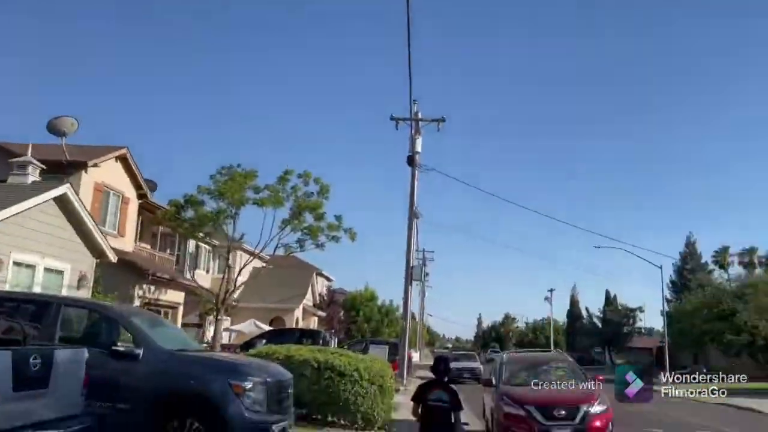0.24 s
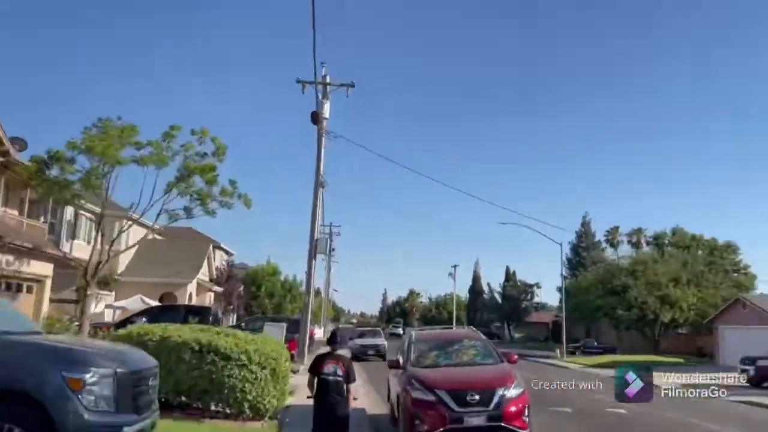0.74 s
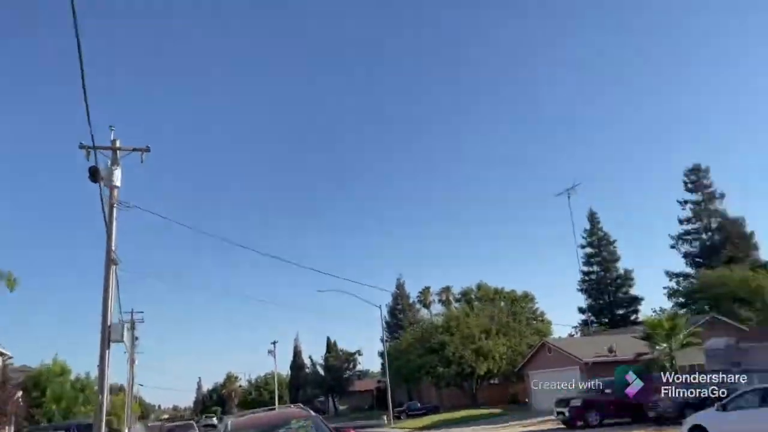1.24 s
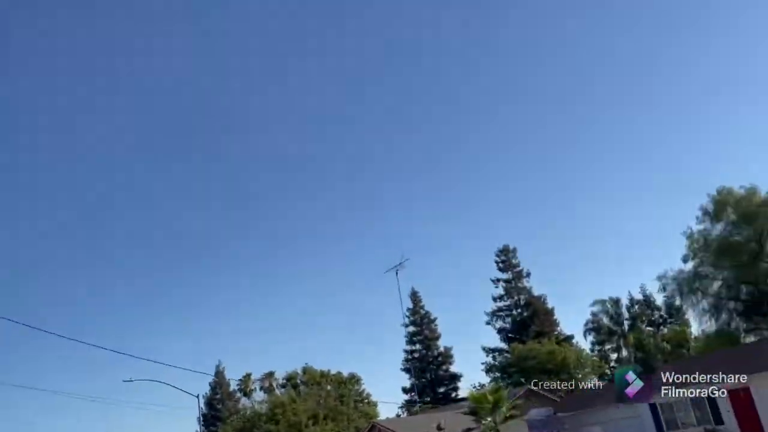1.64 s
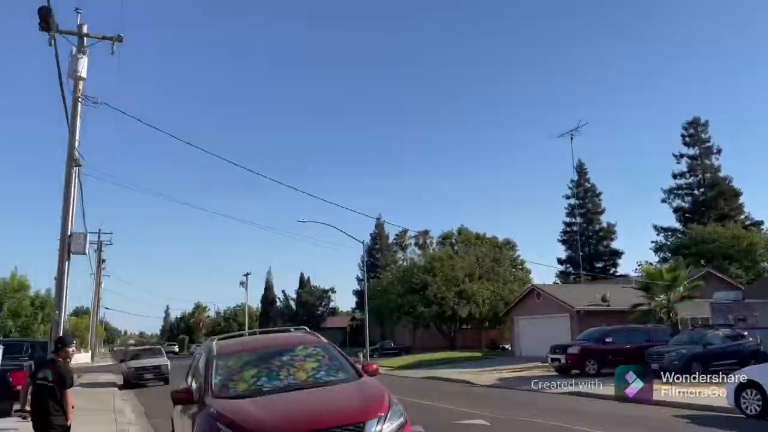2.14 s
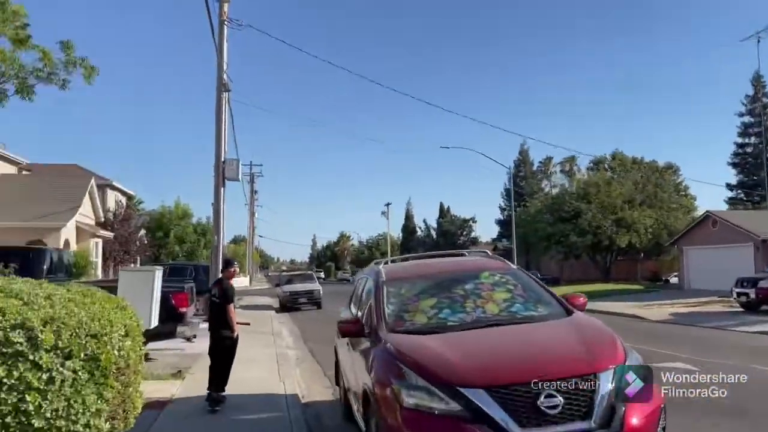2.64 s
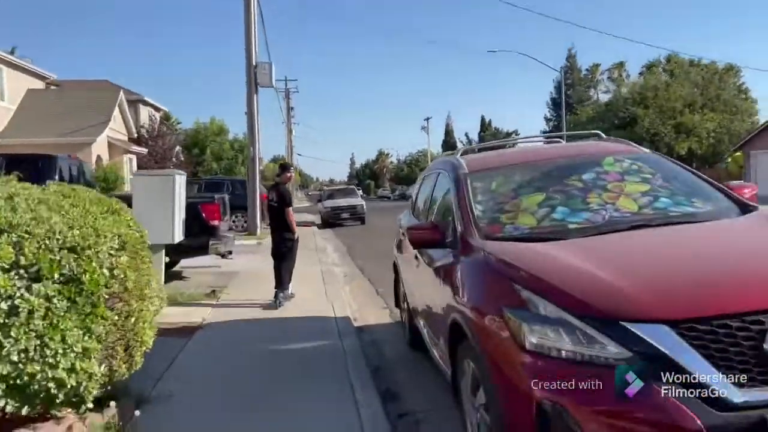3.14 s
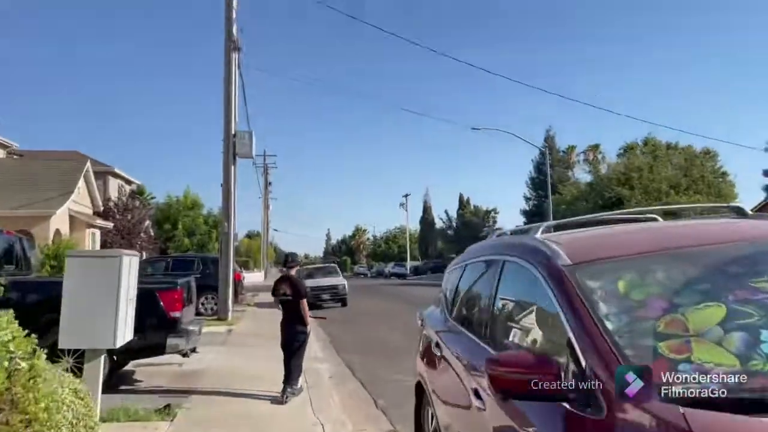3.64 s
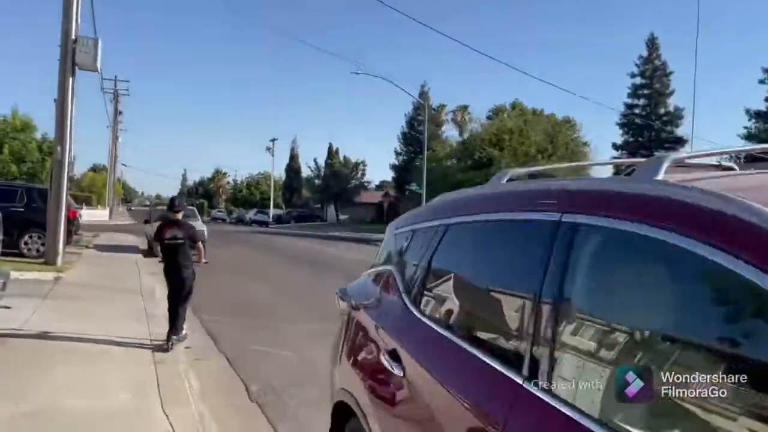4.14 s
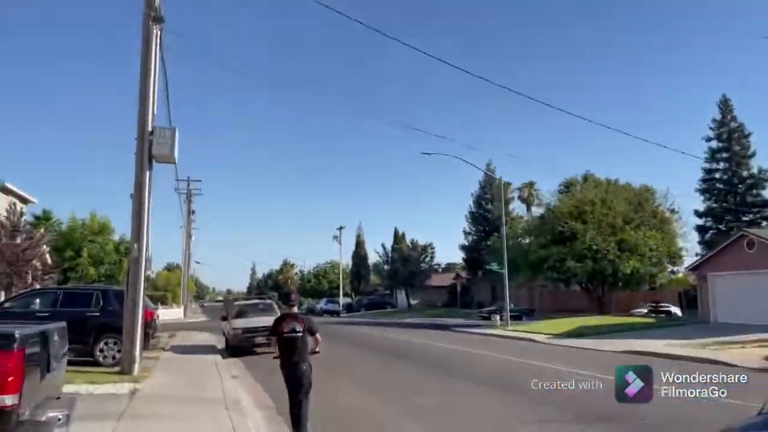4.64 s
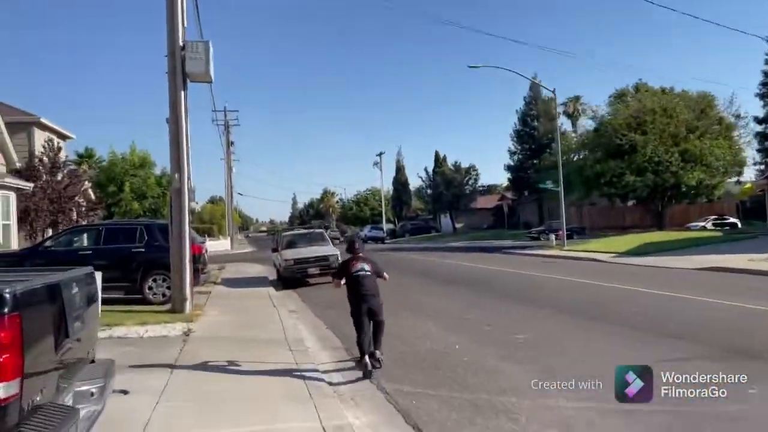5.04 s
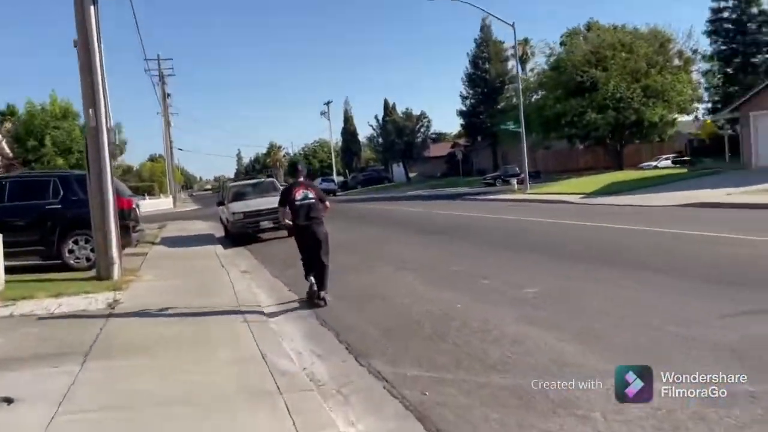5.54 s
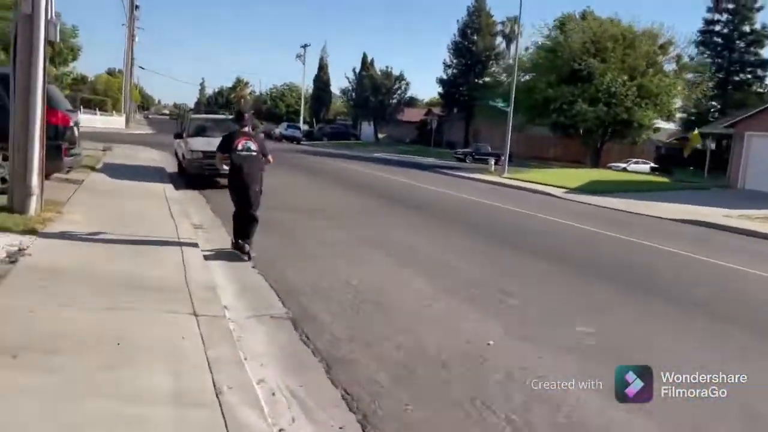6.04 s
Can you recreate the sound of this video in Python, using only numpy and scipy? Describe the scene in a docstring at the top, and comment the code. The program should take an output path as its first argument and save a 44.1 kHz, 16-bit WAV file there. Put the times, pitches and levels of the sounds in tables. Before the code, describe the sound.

Small hard scooter wheels roll over a concrete sidewalk, clacking at the joints and briefly skidding, while wind buffets the microphone.

```python
"""A concrete sidewalk, heard from a rolling scooter with small hard wheels.
Grit roars through the stem, bumps make the deck rumble and thump, and the wheels clack into slab joints.
Now and then gravel cracks, sand hisses or a wheel slips and scrapes; once it skids, the tyre squawking
and the fork rattling. A small metal piece ticks and the bearings whir faintly. The street throws back
thin echoes of the blows, and air buffets the two microphone ports."""
import sys
import numpy as np
from scipy import signal
from scipy.fft import rfft, irfft
from scipy.io import wavfile
from scipy.ndimage import uniform_filter1d

SR = 44100
rng = np.random.default_rng(int(sys.argv[2]) if len(sys.argv) > 2 else 0)


def store_pcm(level_fs):
    """Save levels as 16-bit WAV."""
    pcm = np.round(np.clip(level_fs, -1, 1) * 32767).astype(np.int16)
    wavfile.write(sys.argv[1], SR, np.atleast_2d(pcm).T)


N = 277389
TIME = np.arange(N) / SR
HZ = np.fft.rfftfreq(N, 1 / SR)

# how hard the wheels roll, from speed and coarseness of the concrete: time_s, level_db
ROLL_EFFORT = [(0, -39), (0.35, -40), (0.8, -42), (1.35, -41.5), (1.65, -41.5), (2.2, -41), (2.48, -38),
               (2.73, -39.5), (3.3, -37), (3.45, -39), (3.63, -35.5), (3.82, -42), (3.95, -38),
               (4.4, -35.5), (4.65, -37.5), (4.9, -38), (5.4, -35.5), (5.7, -39), (6.05, -34.5),
               (6.29, -38)]
# narrow resonances of wheels and stem: centre_hz, width_hz, gain_db
STEM_RESONANCES = [(420, 50, 3), (520, 40, 2), (580, 60, -3), (670, 55, 6), (1170, 140, 3), (1410, 50, 2),
                   (1560, 70, -2), (1760, 90, 4), (1930, 130, -7), (2250, 110, 3), (2470, 70, 2),
                   (2660, 130, 3), (3050, 300, -2), (3850, 240, 3), (4480, 120, 3), (5250, 200, 2),
                   (5980, 150, 3), (6320, 150, 3)]
# gusts on the microphone: peak_s, level_db, length_s
GUSTS = [(0.069, -22.5, 0.049), (0.743, -28, 0.051), (1.121, -33.5, 0.05), (1.19, -35.5, 0.04),
         (1.26, -25.5, 0.07), (1.655, -22.5, 0.066), (1.73, -19.5, 0.026), (1.774, -19, 0.015),
         (1.819, -22.5, 0.033), (1.878, -30.5, 0.021), (2.172, -26, 0.05), (2.221, -18.5, 0.02),
         (2.312, -16.5, 0.059), (2.428, -21, 0.062), (2.485, -18.5, 0.024), (2.525, -22.5, 0.022),
         (2.706, -19.5, 0.064), (2.743, -19.5, 0.028), (2.932, -43, 0.22), (3.662, -28.5, 0.098),
         (4.073, -30, 0.26), (4.249, -24, 0.018), (4.546, -28, 0.13), (4.733, -26.5, 0.072),
         (4.87, -32.5, 0.025), (5.03, -33, 0.04), (5.857, -27.5, 0.12), (6.004, -28, 0.065),
         (6.084, -27, 0.062)]


def rolling(gain_db=0.5, grain_db=2, grains_per_s=2500, flicker_db=1.3, drift_db=0.8, cruise_db=-40):
    """Grit roars under the wheels; harder rolling is louder and brighter, and coarse slabs grind more."""
    # tone of the roar: frequency_hz, level_db
    roar_spectrum = [(150, -10), (330, -7.5), (480, -0.5), (670, 0.5), (850, -1.5), (1250, -8.5),
                     (1650, -10.5), (2300, -19), (3000, -24.5), (5000, -28.5), (7500, -39.5), (10000, -42),
                     (13000, -47.5), (15500, -54)]
    # upper mids, low on smooth slabs and high on coarse ones: time_s, gain_db
    coarseness = [(0, -4.5), (0.45, -1), (1.35, -0.5), (1.65, 3.5), (2.7, -2), (3.5, 0), (4.1, 0.5),
                  (4.6, 2), (5.3, 2), (5.85, 2), (6.29, 4)]
    grind_hz, grind_width_hz, hiss_above_hz = 1850, 1100, 2000
    sizes = gain_of(grain_db * np.minimum(rng.exponential(1, (2, N)), 5))
    grains = sizes * rng.standard_normal((2, N)) * sparse((2, N), grains_per_s)
    force = evened(grains) + rng.standard_normal((2, N))
    roar = evened(wheel_tilt(through_stem(force, roar_spectrum)))
    effort_db = follow(ROLL_EFFORT)
    roar *= gain_of(effort_db + gain_db + flicker_db * wander(34) + drift_db * wander(11))
    grind = irfft(rfft(roar) / (1 + (2 * (HZ - grind_hz) / grind_width_hz) ** 4), N)
    roar += grind * (gain_of(follow(coarseness)) - 1)
    hiss = irfft(rfft(roar) / (1 + (hiss_above_hz / (HZ + 1)) ** 6), N)
    return roar + hiss * (gain_of(effort_db - cruise_db) - 1)


def slab_joints(drop_s=0.003, graze_s=0.0041, first_touch=0.05, detune=0.055):
    """A wheel grazes a joint, then slams its far edge: a snap, a clack, a sinking thud in the frame."""
    # wheels hitting joints: start_s, thud_db, clack_db, snap_db
    hits = [(0.1233, -8.5, -23.5, -27.5), (0.705, -29, -30.5, -58), (0.9088, -9, -19.5, -32),
            (1.243, -26.5, -38.5, -62), (1.4448, -10, -17.5, -34.5), (1.464, -25, -45, -44),
            (1.503, -38, -48, -48.5), (1.743, -26, -46, -65.5), (2.143, -26.5, -31.5, -58),
            (2.332, -16.5, -20.5, -38.5), (3.106, -31, -27.5, -44), (3.129, -10.5, -18.5, -31),
            (3.277, -25, -41, -41), (3.875, -8, -14, -25), (3.897, -22, -29, -36), (3.937, -30, -47, -45),
            (4.212, -11.5, -35, -47), (4.267, -42, -16, -27.5), (4.463, -27, -24.5, -46),
            (4.547, -15, -28, -43), (4.599, -15, -22.5, -29), (4.629, -17.5, -30.5, -50),
            (4.706, -16.5, -49, -63.5), (4.999, -16, -36, -44), (5.147, -12.5, -22.5, -34),
            (5.571, -4, -13, -25.5), (5.966, -19, -32.5, -54), (6.057, -10, -38, -47),
            (6.086, -14, -32.5, -43), (6.237, -8, -20, -29), (6.266, -15.5, -28, -49)]
    # modes of deck and frame: pitch_hz, level_db, t60_s
    frame_modes = [(149.5, -7.5, 0.06), (237, 3, 0.038), (301, -6.5, 0.027), (424.4, -5.5, 0.056),
                   (651, -13, 0.069), (926, -20, 0.13), (1310, -37, 0.015)]
    # woody modes of the hard wheel and its fork: pitch_hz, level_db, t60_s
    wheel_modes = [(795, -12, 0.06), (960, -6, 0.077), (1107, -10.5, 0.043), (1351, -3.5, 0.048),
                   (1700, -3, 0.029), (2090, -4.5, 0.041), (2320, -12.5, 0.027), (2767, -20.5, 0.03),
                   (3506, -8.5, 0.021), (6170, -33, 0.05)]
    # the wheel's hard clack: frequency_hz, level_db
    clack_spectrum = [(80, -28.5), (300, 3.5), (600, -8), (1300, -5), (1900, -15.5), (2400, -19.5),
                      (2900, -27), (3700, -24.5), (5500, -50), (7500, -48), (10000, -56), (15500, -70)]
    # the edge's bright snap: frequency_hz, level_db
    snap_spectrum = [(300, -24), (1500, 2.5), (2600, 8), (3500, 2.5), (5500, 1), (7500, -4.5),
                     (10000, -9.5), (13500, -22), (15500, -8)]
    rise_s, thud_rise_s, hold_s = 0.00075, 0.002, 0.0091
    clack_decay_s, snap_decay_s, shake_decay_s = 0.0076, 0.01, 0.038
    t = np.arange(SR // 5) / SR
    stereo = (2, len(t))
    thuds, clacks, snaps = np.zeros(N), np.zeros((2, N)), np.zeros((2, N))
    attack = np.minimum(t / rise_s, 1)
    clack = attack * np.exp(-np.maximum(t - hold_s, 0) / clack_decay_s)  # held as the wheel climbs out
    snap = np.exp(np.minimum(t - drop_s, 0) / graze_s - np.maximum(t - drop_s, 0) / snap_decay_s)
    graze = np.exp(-t[::-1] / graze_s)  # swells into the hit
    sinking = loaded_clock(t, stiffen=0.28, settle_s=0.003)
    for start_s, thud_db, clack_db, snap_db in hits:
        thud = gain_of(thud_db + 1) * ring(frame_modes, sinking, detune, uneven_db=2)
        thud *= 1 - np.exp(-t / thud_rise_s)
        wheel = gain_of(clack_db - 1) * attack * ring(wheel_modes, t, detune, uneven_db=3)
        add(thuds, start_s, first_touch * thud)
        add(thuds, start_s + drop_s, thud + wheel)
        loose_parts = evened(rng.standard_normal(stereo) * sparse(stereo, per_s=2500))
        add(snaps, start_s, gain_of(clack_db - 28) * np.exp(-t / shake_decay_s) * loose_parts)
        add(clacks, start_s - t[-1], gain_of(clack_db - 14) * graze * rng.standard_normal(stereo))
        add(clacks, start_s, gain_of(clack_db - 2) * clack * rng.standard_normal(stereo))
        add(snaps, start_s, gain_of(snap_db + 1) * snap * rng.standard_normal(stereo))
    lean_right = gain_of([[-0.5], [0.5]])
    return thuds * lean_right + through_stem(clacks, clack_spectrum) + through_stem(snaps, snap_spectrum)


def deck_thumps(gain_db=5, rise_s=0.0047, t60_s=0.075, overtone_ratio=2.4, overtone_db=-8):
    """Over a bump the deck bounces for a few cycles, sinking in pitch as the load comes off."""
    # bounces of the deck: start_s, level_db, settled_pitch_hz
    bounces = [(0.705, -17, 125), (1.238, -22, 144.6), (3.683, -17, 141), (4.092, -27, 191),
               (4.21, -12.5, 124), (4.235, -22, 160), (4.531, -20, 130), (4.549, -17.5, 234),
               (4.574, -33, 173), (4.723, -20.5, 100.3), (4.738, -18, 145), (4.872, -25.5, 126),
               (5.023, -29, 140), (6.068, -12, 103), (6.095, -20, 194)]
    t, out = np.arange(SR // 5) / SR, np.zeros(N)
    attack = 1 - np.exp(-t / rise_s)
    sinking = loaded_clock(t, stiffen=0.26, settle_s=0.0065)
    for start_s, db, hz in bounces:
        modes = [(hz, 0, t60_s), (hz * overtone_ratio, overtone_db, t60_s / 2)]
        add(out, start_s, gain_of(db + gain_db) * attack * ring(modes, sinking, detune=0.024))
    return out


def deck_rumble(lumpy_db=3):
    """Bumps in the concrete shake the deck in lumps, most on broken patches."""
    # the running rumble: time_s, level_db
    rumble_curve = [(0, -44), (0.55, -44), (1.1, -43), (1.9, -49), (2.5, -38), (2.87, -43), (3.05, -36),
                    (3.25, -40.5), (3.47, -41), (3.6, -36), (3.82, -38), (3.95, -33), (4.38, -48),
                    (4.85, -38), (5.25, -41.5), (5.65, -35), (5.9, -32), (6.29, -27)]
    # broken patches of concrete: middle_s, level_db, length_s
    patches = [(1.673, -38.5, 0.29), (4.137, -29.5, 0.073), (4.256, -23, 0.049), (4.567, -24, 0.13),
               (4.743, -34.5, 0.075), (5.845, -42, .08), (6.06, -23, 0.064)]
    # tone of the shaking deck: frequency_hz, level_db
    rumble_spectrum = [(50, -14.5), (110, 2.5), (180, 2.5), (250, -1), (330, -0.5), (420, -5), (600, -11),
                       (1000, -26), (3000, -57)]
    bumps = lumpy_noise(lumpy_db, rate_hz=53)
    power = gain_of(follow(rumble_curve)) ** 2 + sum(swell(*patch) for patch in patches)
    return evened(through_stem(bumps, rumble_spectrum)) * np.sqrt(power)


def wheel_throb(gain_db=-7, centre_hz=1130, width_hz=240, turns_per_s=9.6, depth_db=4.5):
    """A hollow note of the wheel swells once a turn, as its worn side meets the concrete."""
    note = band_noise(resonance(HZ, centre_hz, width_hz))
    turns = turns_per_s * TIME + 0.31 * wander(1)
    throb = gain_of(depth_db * np.cos(2 * np.pi * turns))
    return evened(note * throb) * gain_of(follow(ROLL_EFFORT) + gain_db)


def wheel_scrapes(judder_db=3):
    """A wheel slipping sideways grinds, judders and swells, then fades or cuts off abruptly."""
    # slips, each silent after stop_s even if still rising: start_s, rise_toward_s, stop_s, level_db
    slips = [(2.807, 3.053, 3.03, -32), (3.708, 3.782, 3.808, -33.5), (4.405, 4.484, 4.64, -28.5),
             (5.324, 5.44, 5.6, -31), (5.948, 6.1, 6.1, -49)]
    # tone of the scrape: frequency_hz, level_db
    scrape_spectrum = [(300, -40), (900, 0), (1350, 3), (1750, -2.5), (1950, -0.5), (2250, -6.5),
                       (3100, -24), (3600, -19), (5000, -18.5), (7300, -35.5), (9500, -32), (12000, -71),
                       (15500, -54)]
    pressure = sum(gain_of(db) * np.interp(TIME, times, [0, 1, 0]) for *times, db in slips)
    grind = lumpy_noise(judder_db, rate_hz=110)
    return pressure * evened(wheel_tilt(through_stem(grind, scrape_spectrum)))


def tyre_squawk(jitter=0.019, rough_db=2):
    """The skidding tyre sticks and slips in a rough note that climbs as it is loaded."""
    # course of the squawk: time_s, pitch_hz, level_db
    skid = [(3.679, 630, -50), (3.683, 634, -15.5), (3.691, 630, -23), (3.698, 682, -20),
            (3.708, 760, -32.5), (3.724, 790, -21), (3.733, 870, -57)]
    cycles = np.cumsum(follow(skid) * (1 + jitter * wander(240))) / SR
    skidding = (TIME > skid[0][0]) & (TIME < skid[-1][0])
    level = gain_of(follow(skid, column=2) + rough_db * wander(160))
    return skidding * level * np.sin(2 * np.pi * cycles)


def fork_rattle(chatter_db=2, ring_db=-4, rise_s=0.0039):
    """A skidding wheel grips and lets go, rattling its fork."""
    # skips of the wheel: start_s, level_db, decay_s, pitch_ratio
    skips = [(3.681, -20, 0.0081, 1.02), (3.695, -11, 0.0043, 1.01), (3.701, -17, 0.0068, 1.0),
             (3.708, -22.5, 0.013, 1.2), (3.715, -34, 0.006, 1.5), (3.721, -16.5, 0.0064, .94)]
    # modes of the loose fork: pitch_hz, level_db, t60_s
    fork_modes = [(1390, -26, 0.089), (1467, -16, 0.074), (1530, 8.5, 0.024), (1600, -7, 0.081),
                  (1791, -18, .13), (2190, 3, 0.022), (4380, -7, 0.035)]
    # tone of the chattering contact: frequency_hz, level_db
    chatter_spectrum = [(100, -9), (400, -4), (750, -7), (1050, -1), (1550, 4.5), (2200, -2), (3100, -5),
                        (4400, -8), (5500, -7.5), (7500, -15), (11000, -18), (15500, -39)]
    t, force, rings = np.arange(SR // 5) / SR, np.zeros((2, N)), np.zeros(N)
    for start_s, db, decay_s, pitch_ratio in skips:
        contact = (1 - np.exp(-t / rise_s)) * np.exp(-t / decay_s)
        add(force, start_s, gain_of(db + chatter_db) * contact * rng.standard_normal((2, len(t))))
        add(rings, start_s, gain_of(db + ring_db) * ring(fork_modes, t * pitch_ratio, detune=0.003))
    return through_stem(force, chatter_spectrum) + rings


def metal_ticks(gain_db=5, snap_db=-8, snap_s=0.00084, rise_s=0.00053, upper_hz=5300, upper_t60_s=0.051):
    """A small metal piece snaps and rings; where it strikes decides how much its upper ring speaks."""
    # strikes of the piece: start_s, level_db, pitch_ratio, upper_ring_db
    strikes = [(4.444, -27, .99, -7), (4.600, -31, 1.1, -12), (4.843, -17, .99, -24),
               (4.940, -27, .98, -19), (5.008, -26, 1.01, -19), (5.165, -22.5, 1.0, -21),
               (5.311, -26, 1.0, -16), (5.425, -28, 1.01, -15), (5.719, -32, 1.01, -15)]
    # modes of the piece: pitch_hz, level_db, t60_s
    metal_modes = [(3680, -9, .011), (3920, -2, .015), (4328, -12, .011), (5750, -14, .007),
                   (6420, -15, .01), (7100, -20, .015), (7700, -21, .009), (10430, -28, .01)]
    t, out = np.arange(SR // 10) / SR, np.zeros(N)
    attack = 1 - np.exp(-t / rise_s)
    for start_s, db, pitch_ratio, upper_db in strikes:
        snap = gain_of(snap_db) * np.exp(-t / snap_s) * rng.standard_normal(len(t))
        modes = [*metal_modes, (upper_hz, upper_db, upper_t60_s)]
        ping = ring(modes, t * pitch_ratio, detune=0)
        add(out, start_s, gain_of(db + gain_db) * attack * (ping + snap))
    low_cut = signal.butter(6, 3450, "high", fs=SR, output="sos")  # too small to radiate lower notes
    return signal.sosfilt(low_cut, out)


def gravel_cracks(cracks_per_s=1500):
    """A bit of gravel crushed under a wheel gives a short, crisp cluster of cracks."""
    # crushed bits: start_s, level_db, decay_s
    bits = [(0.889, -49, 0.016), (2.853, -53, .003), (3.094, -52, .003), (4.092, -47, 0.011),
            (4.218, -35.5, 0.01), (4.247, -41, 0.0053), (4.288, -35.5, 0.012), (6.036, -49, .004),
            (6.049, -42, 0.0033), (6.112, -43, 0.015)]
    # tone of the crunch: frequency_hz, level_db
    crunch_spectrum = [(800, -33), (2500, 9), (4000, -4.5), (6500, 1), (11000, -6), (15500, -7)]
    t, force = np.arange(SR // 10) / SR, np.zeros(N)
    for start_s, db, decay_s in bits:
        cracks = evened(rng.choice([-1., 1.], len(t)) * sparse(len(t), cracks_per_s))
        add(force, start_s, gain_of(db) * np.exp(-t / decay_s) * cracks)
    return colour(force, over_hz(crunch_spectrum))


def sand_hiss(width_octaves=0.32, crackle_db=3):
    """Loose sand hisses under the wheels, higher where it is finer."""
    # sandy stretches: middle_s, level_db, length_s, centre_hz
    stretches = [(1.98, -56, 0.52, 2350), (2.522, -48.5, 0.12, 2440), (2.6, -60.5, 0.39, 3420),
                 (2.98, -57.5, 0.22, 4000), (3.654, -51, 0.1, 3140), (5.42, -54, 0.15, 4670),
                 (6.0, -52, 0.27, 2860), (6.12, -49, 0.084, 3300)]
    out = np.zeros((2, N))
    grains = rfft(lumpy_noise(crackle_db, rate_hz=300))
    for middle_s, db, length_s, centre_hz in stretches:
        band = 1 / (1 + (np.log2((HZ + 1) / centre_hz) / width_octaves) ** 2) ** 2
        out += evened(irfft(grains * band, N)) * np.sqrt(swell(middle_s, db, length_s))
    return ports(out)


def bearing_whir(level_db=-68, waver_db=1, centre_hz=3780, half_width_hz=190):
    """The wheel bearings whir faintly, wavering in level."""
    whir = band_noise(1 / (1 + ((HZ - centre_hz) / half_width_hz) ** 4))
    return evened(whir) * gain_of(level_db + waver_db * wander(11))


def wind_buffet(gain_db=-1, gusty_db=2.5, smooth_s=0.022):
    """Eddies press on the ports in a light breeze with short, distinct puffs."""
    # air between gusts: time_s, level_db
    breeze = [(0, -31.5), (0.4, -37), (0.6, -47), (0.8, -35.5), (1.55, -32.5), (1.98, -35), (2.85, -29),
              (3.45, -43), (4.4, -45.5), (5.0, -38), (5.65, -40), (6.29, -32.5)]
    # tone of the buffeting: frequency_hz, level_db
    buffet_spectrum = [(12, -61), (30, -22), (50, 3.5), (85, 2), (130, -6.5), (200, -25), (400, -46.5),
                       (1500, -84.5)]
    eddies = ports(colour(rng.standard_normal((2, N)), over_hz(buffet_spectrum)))
    eddy_power = (abs(signal.hilbert(eddies)) ** 2).mean(0)
    strength = np.sqrt(uniform_filter1d(eddy_power, int(smooth_s * SR)) + 0.055)
    steady = evened(eddies / strength)  # flattened so that the gusts shape the level
    power = gain_of(follow(breeze)) ** 2 + sum(swell(*gust, linger=0.71) for gust in GUSTS)
    pressure = steady * np.sqrt(power) * gain_of(gain_db + gusty_db * wander(22))
    return signal.sosfilt(signal.butter(3, 32, "high", fs=SR, output="sos"), pressure)


def gust_flutter(gain_db=-11, lumpy_db=4):
    """At its height a gust breaks into small eddies that flutter on the ports."""
    # tone of the small eddies: frequency_hz, level_db
    flutter_spectrum = [(60, -24.5), (140, 2.5), (200, -2.5), (300, -18), (500, -19.5), (1500, -84)]
    eddies = colour(lumpy_noise(lumpy_db, rate_hz=70), over_hz(flutter_spectrum))
    power = sum(swell(peak_s, db + gain_db, length_s) for peak_s, db, length_s in GUSTS)
    return evened(ports(eddies)) * np.sqrt(power)


def street_echoes(x, wet_db=-17, t60_s=0.16, delay_s=0.013):
    """Parked cars and house fronts add a thin scatter of echoes to a sound."""
    t = np.arange(SR // 2) / SR
    taps = rng.standard_normal((2, len(t))) * sparse((2, len(t)), per_s=1500)
    taps *= gain_of(-60 * t / t60_s) * (t > delay_s)
    taps /= np.linalg.norm(taps, axis=1, keepdims=True)
    return x + gain_of(wet_db) * ports(signal.fftconvolve(x, taps, axes=1)[:, :N])


def through_stem(force, spectrum):
    """A force on the wheels radiates with the resonances of wheels and stem."""
    peaks_db = sum(db * resonance(HZ, hz, width_hz) for hz, width_hz, db in STEM_RESONANCES)
    return ports(colour(force, over_hz(spectrum) + peaks_db))


def wheel_tilt(x, depth_db=2.5, drift=0.018, change_s=0.06):
    """As the wheels turn and tilt, each resonance drifts in pitch and comes and goes."""
    hz, _, frames = signal.stft(x, SR, nperseg=1024, noverlap=768)
    span = int(change_s * SR / 256)
    motion = rng.standard_normal((len(STEM_RESONANCES), 2, frames.shape[-1]))
    motion = evened(uniform_filter1d(uniform_filter1d(motion, span), span))
    db = sum(depth_db * strength * resonance(hz[:, None], centre * (1 + drift * tilt), 2 * width)
             for (centre, width, _), (strength, tilt) in zip(STEM_RESONANCES, motion))
    return signal.istft(frames * gain_of(db), SR, nperseg=1024, noverlap=768)[1][:, :N]


def ports(x):
    """Two unrelated signals become the partly alike sound at the left and right port."""
    # likeness of the two ports: frequency_hz, coherence (0-1)
    likeness = [(60, .85), (200, .62), (380, .42), (700, .68), (1200, .91), (2400, .78), (4000, .75),
                (6000, .4), (7200, .5), (7800, .99), (8800, .99), (9600, .7), (11500, .82), (14200, .95)]
    same = np.clip(over_hz(likeness), 0, 1)
    common, apart = rfft(x) * np.sqrt([(1 + same) / 2, (1 - same) / 2])
    return irfft(np.array([common + apart, common - apart]), N)


def ring(modes, t, detune, uneven_db=0):
    """Struck modes; each blow lands elsewhere, shifts them slightly and favours some of them."""
    shifts = 1 + detune * rng.uniform(-1.26, 1, len(modes))
    favours_db = uneven_db * rng.uniform(-1.33, 1, len(modes))
    return sum(gain_of(db + favour_db - 60 * t / t60_s) * np.sin(2 * np.pi * hz * shift * t)
               for (hz, db, t60_s), shift, favour_db in zip(modes, shifts, favours_db))


def loaded_clock(t, stiffen, settle_s):
    """The clock of a ring that starts sharp under load and sinks to its own pitch."""
    return t + stiffen * settle_s * (1 - np.exp(-t / settle_s))


def colour(x, db):
    """Minimum-phase filter of unit energy, shaped by db over HZ."""
    cepstrum = irfft(db * np.log(10) / 20, N)
    cepstrum[1:N // 2] *= 2
    cepstrum[N // 2:] = 0
    response = np.exp(rfft(cepstrum))
    return irfft(rfft(x) * response / np.sqrt(np.mean(abs(response) ** 2)), N)


def resonance(hz, centre_hz, width_hz):
    """A peak of height 1, width_hz wide at half height."""
    return 1 / (1 + (2 * (hz - centre_hz) / width_hz) ** 2)


def band_noise(band):
    """Noise at the two ports, weighted by band over HZ."""
    return ports(irfft(rfft(rng.standard_normal((2, N))) * band, N))


def lumpy_noise(depth_db, rate_hz):
    """Two channels of noise whose level wanders."""
    return rng.standard_normal((2, N)) * gain_of(depth_db * wander(rate_hz))


def sparse(shape, per_s):
    """A gate that opens for single samples at random."""
    return rng.random(shape) < per_s / SR


def wander(rate_hz):
    """Smooth random motion of rms 1, rolling off around rate_hz."""
    return evened(irfft(rfft(rng.standard_normal(N)) * np.exp(-(HZ / rate_hz) ** 2), N))


def swell(peak_s, db, length_s, linger=1):
    """Power of a bell-shaped swell whose fall is linger times its rise."""
    offset = 2 * (TIME - peak_s) / length_s
    return gain_of(db) ** 2 * np.exp(-np.where(offset < 0, offset, offset / linger) ** 2)


def over_hz(points):
    """A frequency curve at every bin, interpolated on a log axis."""
    hz, value = np.transpose(points)
    return np.interp(np.log(HZ + 1), np.log(hz + 1), value)


def follow(rows, column=1):
    """One column of a time curve at every sample."""
    rows = np.array(rows)
    return np.interp(TIME, rows[:, 0], rows[:, column])


def add(mix, start_s, sound):
    """Mixes a sound in at start_s, or at zero if that is earlier."""
    part = mix[..., max(round(start_s * SR), 0):][..., :sound.shape[-1]]
    part += sound[..., :part.shape[-1]]


def gain_of(db):
    """Decibels to amplitude."""
    return 10 ** (np.asarray(db) / 20)


def evened(x):
    """Scales to rms 1."""
    return x / np.sqrt(np.mean(x ** 2) + 1e-20)


def scene():
    """Blows and the skid with their echoes, over a bed of rolling noise and wind."""
    blows = slab_joints() + deck_thumps() + gravel_cracks()
    foreground = street_echoes(blows + fork_rattle() + tyre_squawk() + metal_ticks())
    bed = rolling() + wheel_throb() + wheel_scrapes() + sand_hiss() + bearing_whir() + deck_rumble()
    return foreground + bed + wind_buffet() + gust_flutter()


def record(dry):
    """The phone's stereo processing tilts level and turns phase; peaks are rounded, the top is cut."""
    # level between the channels: frequency_hz, left_minus_right_db
    balance = [(100, -1), (600, 0.5), (1200, -3.5), (2500, -3), (5000, -3), (7500, 1.5), (15000, 1)]
    # phase between the channels: frequency_hz, left_lead_rad
    lead = [(100, 0), (520, .6), (1200, .45), (2400, .25), (3200, 1.0), (4000, .5), (5200, 1.7),
            (6500, 5.6), (7700, 3.14), (8800, 3.14), (10700, 0), (12700, 0), (14000, -3.14)]
    fade_s, ceiling, top_hz = 0.003, 0.92, 15800
    side = np.array([[0.5], [-0.5]])
    stereo = gain_of(side * over_hz(balance)) * np.exp(1j * side * over_hz(lead))
    fade = np.minimum(np.minimum(TIME, TIME[::-1]) / fade_s, 1)
    heard = irfft(rfft(dry * fade) * stereo, N)
    heard /= (1 + (heard / ceiling) ** 8) ** (1 / 8)
    high_cut = signal.firwin(511, top_hz, window=("kaiser", 9), fs=SR)
    return signal.oaconvolve(heard, high_cut[None], "same")


dry = scene()
out = record(dry)
store_pcm(out)
```